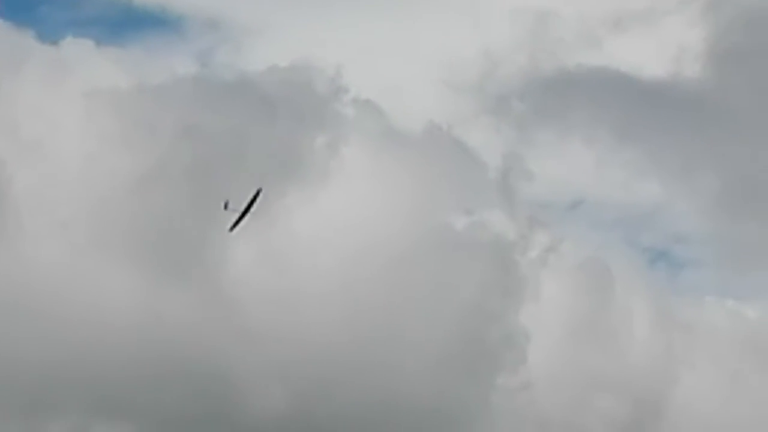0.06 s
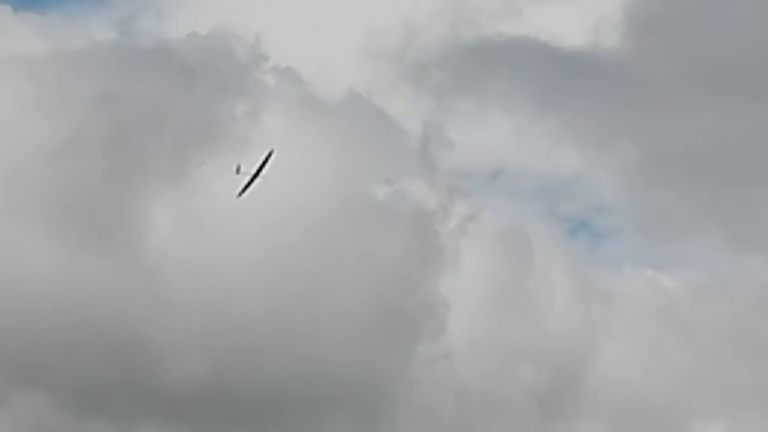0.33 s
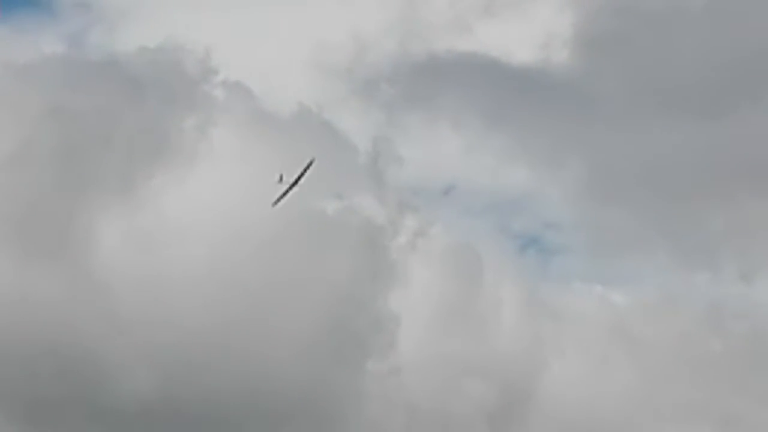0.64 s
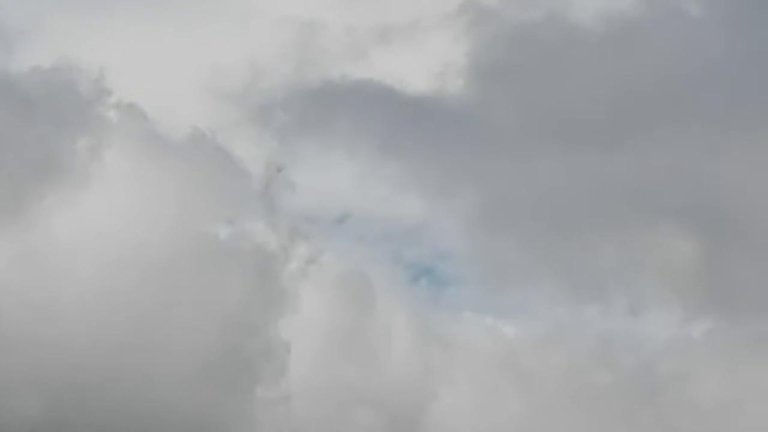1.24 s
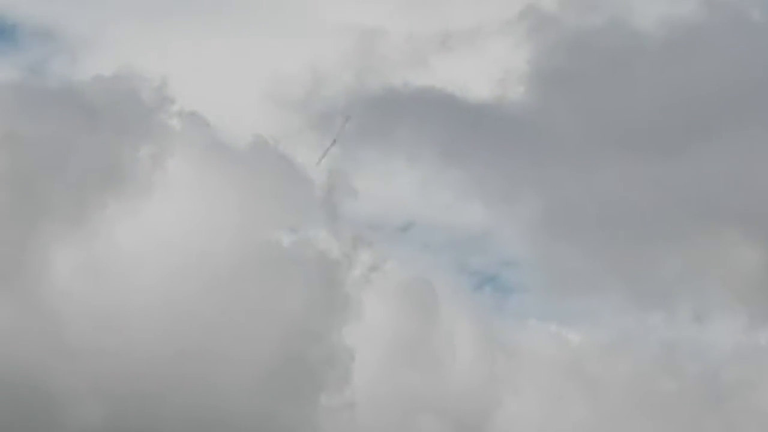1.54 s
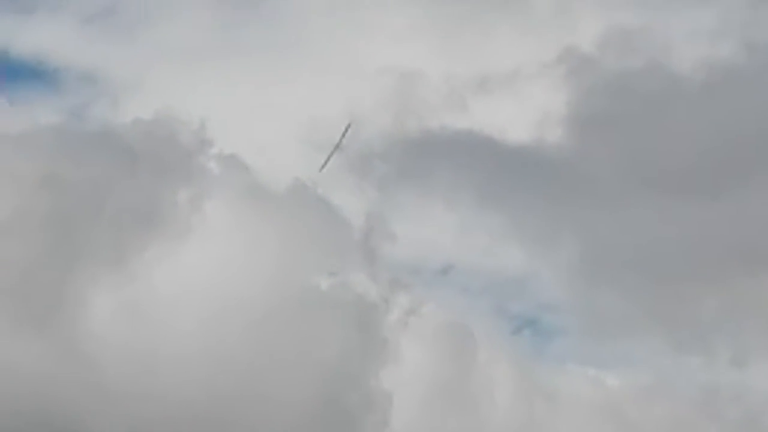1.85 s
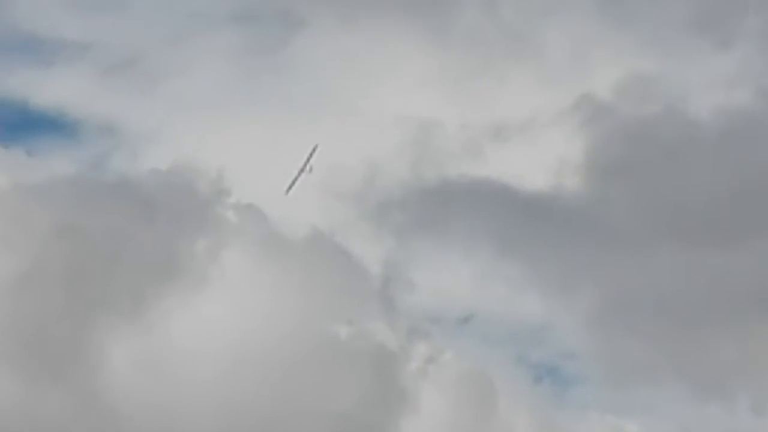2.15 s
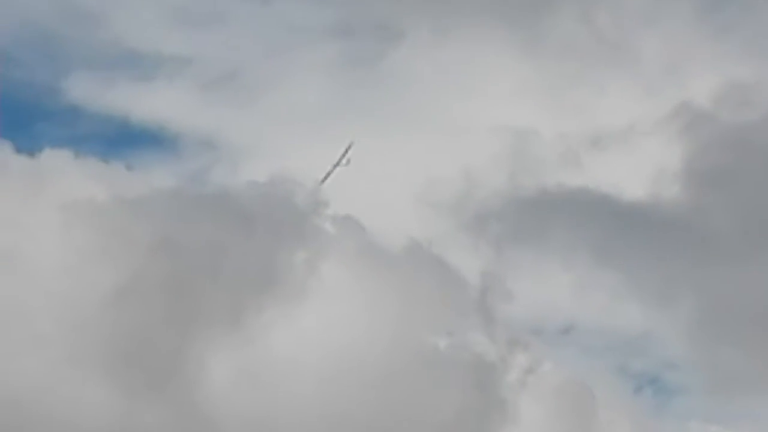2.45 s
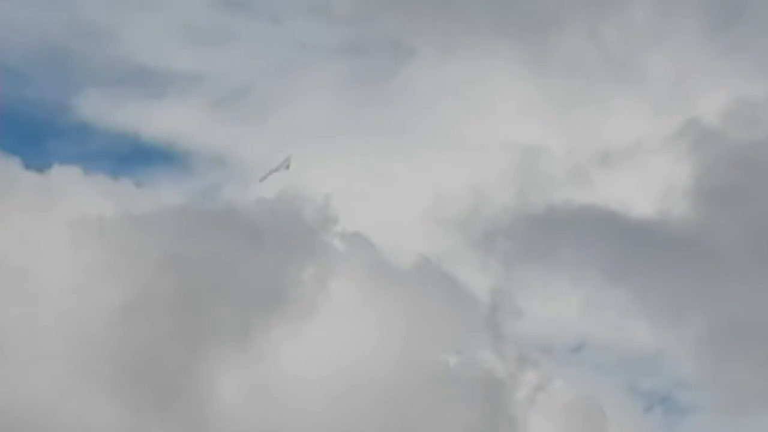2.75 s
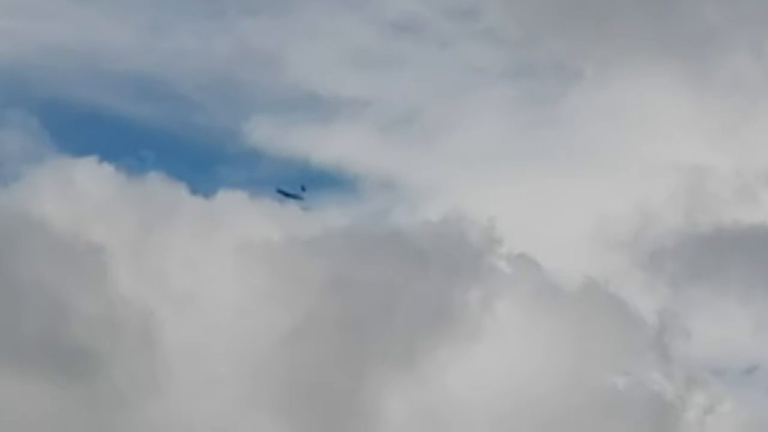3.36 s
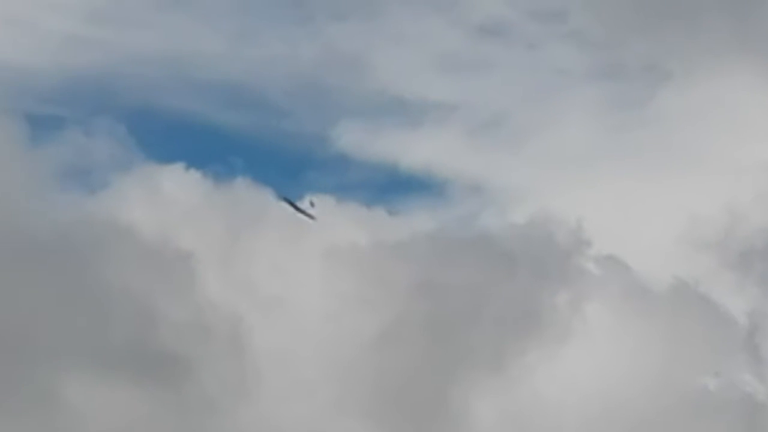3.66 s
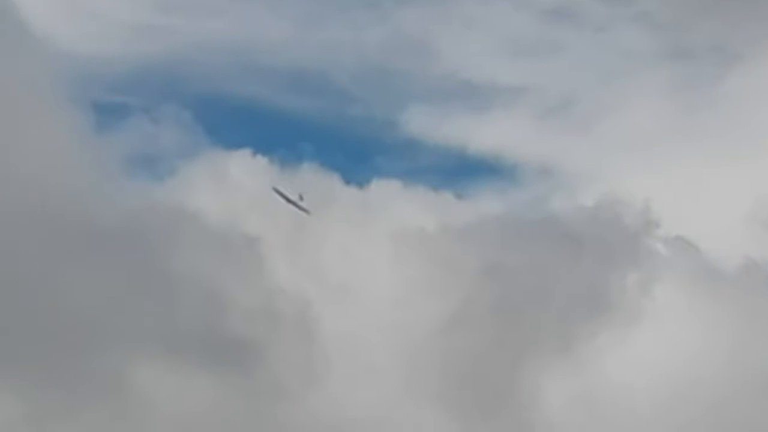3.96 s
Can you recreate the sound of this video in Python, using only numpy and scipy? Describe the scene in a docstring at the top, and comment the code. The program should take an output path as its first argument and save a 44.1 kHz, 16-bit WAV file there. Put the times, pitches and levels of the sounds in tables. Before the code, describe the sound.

Wind buffets the microphone outdoors while a model glider's faint airy whoosh fades away.

```python
"""Model glider in gusty wind

A model glider sweeps past with an airy whoosh off its wings, then banks away and fades.
Gusty wind rumbles on the microphone; its strongest eddies hit as thumps and sputtering buffets.
Behind it: a light grass rustle, a few faint ticks and a steady hiss."""
import sys
import numpy as np
from scipy import signal
from scipy.fft import rfft, irfft, next_fast_len
from scipy.io import wavfile
from scipy.ndimage import uniform_filter1d, map_coordinates

SR = 44100
rng = np.random.default_rng(int(sys.argv[2]) if len(sys.argv) > 2 else 0)


def file_out(sig):
    """Save sig as 16-bit WAV at sys.argv[1]."""
    # one column per channel
    cols = np.atleast_2d(sig).T
    # limit, then scale
    lim = np.clip(cols, -1, 1)
    pcm = np.round(lim * 32767).astype(np.int16)
    wavfile.write(sys.argv[1], SR, pcm)


N = 176400
TIME_S = np.arange(N) / SR

# glider pass: time_s, body_level_db, treble_over_body_db
GLIDER_PASS = [(0, -47, -2.5), (.07, -52.5, -9.5), (.2, -55, -12.5), (.29, -56.5, -3.5), (.38, -52, -6),
               (.49, -49.5, -7), (.58, -53, -6.5), (.66, -62.5, -2.5), (.72, -68, -3.5), (.85, -61, -1),
               (.93, -61.5, -5), (1.12, -65.5, 1), (1.3, -80, 5.5), (1.7, -81.5, -8.5), (4, -91, -11)]
# wing noise, body and treble: freq_hz, relative_db
WING_BODY_SPECTRUM = [(300, -10), (900, -4.5), (1450, 4.5), (2400, -1), (3700, 0.5), (4400, -5.5),
                      (5100, -14), (10000, -70)]
WING_TREBLE_SPECTRUM = [(2500, -21), (5200, -6.5), (6000, -2.5), (6800, -4), (7600, -7), (9000, -10.5),
                        (11400, -16.5), (12000, -25), (14300, -23.5)]
# wind strength: time_s, level_db
GUST_LEVELS = [(0, -19), (.1, -26), (.33, -22.5), (.41, -31), (.52, -35), (.69, -31), (.75, -19.5),
               (.9, -26), (1.04, -25), (1.26, -30), (1.31, -19.5), (1.45, -18.5), (1.57, -22),
               (1.64, -27.5), (1.89, -31.5), (1.97, -31), (2.0, -16), (2.07, -25.5), (2.25, -28),
               (2.295, -15.5), (2.34, -26.5), (2.5, -34.5), (2.6, -15.5), (2.67, -23.5), (2.85, -21),
               (3.25, -20), (3.39, -16), (3.45, -28.5), (3.63, -18.5), (3.69, -26), (3.92, -19.5), (4, -26)]
# wind noise, low to high: freq_hz, relative_db
RUMBLE_SPECTRUM = [(6, -26.5), (16, 7), (30, -1.5), (55, -4), (100, -7), (180, -14), (280, -25.5),
                   (420, -53.5), (1200, -110)]
FLUTTER_SPECTRUM = [(40, -23), (120, -5.5), (200, -0.5), (320, -8), (450, -20), (750, -41), (2000, -110)]
FLAP_SPECTRUM = [(200, -20), (350, -1), (480, 1), (620, -8), (800, -7.5), (1050, -19.5), (1500, -39.5),
                 (3000, -110)]
RASP_SPECTRUM = [(450, -27.5), (780, 3.5), (1000, 2), (1250, -2), (1600, -12), (2100, -33), (4000, -68.5)]
# large eddies: centre_s, relative_db, pitch_hz
THUMP_EVENTS = [(.255, -11.5, 39), (0.277, -23.5, 101), (0.333, -19.5, 233), (0.751, -14.5, 115),
                (1.092, -18.5, 138), (1.362, -15, 126), (1.44, -18, 69), (1.744, -22, 132),
                (1.994, -19.5, 130), (2.03, -15, 39.6), (2.294, -9.5, 72.3), (2.603, -4, 180),
                (2.845, -10.5, 29.6), (3.193, -17.5, 173), (3.352, -19.5, 130), (3.393, -11.5, 190)]
# sputtering buffets: centre_s, relative_db
BUFFET_EVENTS = [(0.333, -48.5), (0.751, -51), (1.192, -53), (1.291, -37), (1.349, -39.5), (1.364, -36),
                 (1.4, -28.5), (1.412, -32), (1.441, -32.5), (1.463, -25.5), (1.57, -38.5), (2.146, -50),
                 (2.297, -36), (2.603, -27.5), (2.617, -29), (2.674, -42), (2.723, -41), (2.749, -44),
                 (2.848, -34.5), (2.862, -25), (2.93, -43.5), (2.963, -23.5), (2.982, -43), (3.054, -36),
                 (3.072, -41.5), (3.128, -39), (3.153, -25.5), (3.196, -43), (3.246, -36), (3.348, -35.5),
                 (3.359, -43), (3.394, -42.5), (3.559, -47), (3.616, -40.5), (3.629, -35.5), (3.73, -47),
                 (3.757, -40), (3.814, -45), (3.858, -38), (3.947, -40)]
# grass rustle: time_s, level_db
RUSTLE_LEVELS = [(0, -90), (1.3, -70), (1.39, -56), (1.5, -62.5), (1.61, -73), (1.64, -58.5), (1.71, -75.5),
                 (1.85, -82.5), (2.02, -71), (2.08, -66), (2.17, -65), (2.3, -72.5), (2.6, -69.5),
                 (2.98, -61.5), (3.14, -66), (3.36, -72), (3.55, -75.5), (3.7, -66.5), (3.81, -80.5),
                 (4, -65.5)]
# brighter swishes: centre_s, level_db
SWISH_EVENTS = [(2.15, -71.5), (3.08, -74.5), (3.7, -77)]
# rustle, swish and steady hiss: freq_hz, relative_db
RUSTLE_SPECTRUM = [(400, -18), (1000, 7.5), (1600, 4), (2400, 0), (3600, 0), (5500, -8), (8000, -10.5),
                   (10000, -10.5), (12000, -23.5), (14300, -20.5)]
SWISH_SPECTRUM = [(4500, -17.5), (8000, 0), (12000, -16.5)]
HISS_SPECTRUM = [(1200, 7.5), (2500, -9), (5600, 4.5), (8000, -1.5), (14300, -3)]
# dry contacts: start_s, level_db, pitch_hz, t60_s, half_width_oct
TICK_EVENTS = [(0.248, -39, 3420, 0.024, 0.14), (.476, -35.5, 1760, 0.02, 0.27),
               (.858, -40.5, 1900, 0.013, 0.8), (1.378, -40.5, 3980, 0.0097, 0.71),
               (1.564, -57, 7200, .028, 0.15), (1.635, -60, 7800, .11, 0.18),
               (2.051, -51, 3450, 0.11, 0.19), (3.286, -41, 1900, 0.014, 0.33)]


def glider():
    """Turbulent air off the wings; level and brightness follow distance and bank."""
    level_db, treble_db = curves(GLIDER_PASS)
    body = drifting_comb(noise(WING_BODY_SPECTRUM))
    treble = shimmer(noise(WING_TREBLE_SPECTRUM)) * amp(treble_db)
    return amp(level_db) * (body + treble)


def wind(reference_db=-22):
    """Turbulence at the microphone; flutter and sputter grow faster with a gust than the rumble."""
    gust_db = uniform_filter1d(curves(GUST_LEVELS)[0], size=400) - reference_db
    churn = wobble(rate_hz=70)
    rumble = steadied(noise(RUMBLE_SPECTRUM), window_samples=2200) * amp(1 + gust_db)
    flutter = steadied(noise(FLUTTER_SPECTRUM), window_samples=1000)
    flutter *= amp(-19 + 1.45 * gust_db + 9.54 * churn)
    sputter = noise(FLAP_SPECTRUM) * amp(-47.5 + 3.2 * gust_db + 9.9 * churn + 7.5 * wobble(rate_hz=180))
    return amp(reference_db) * (rumble + flutter + sputter + eddies(gust_db))


def eddies(gust_db, rate_hz=38, pitch_hz=153.6, rise_oct_per_db=0.16, scatter_db=2.5):
    """Small eddies at irregular times; faster air makes them louder, shorter and higher."""
    out, t = np.zeros(N + SR), np.arange(-1300, 1300) / SR
    for k, (jitter, strength, detune, half_turns) in enumerate(rng.uniform(-1, 1, (400, 4))):
        i = int((k + 1 + jitter) / rate_hz * SR)
        if i < N:
            gain = amp(-3.5 + gust_db[i] + scatter_db * strength)
            hz = pitch_hz * 2 ** (rise_oct_per_db * gust_db[i]) * np.exp(.35 * detune)
            out[i:i + len(t)] += gain * pressure_swing(t * hz, half_turns, half_cycles=.45)
    return out[len(t) // 2:][:N]


def thumps(gain_db=4):
    """Each large eddy is one deep swing of pressure."""
    out = np.zeros(N)
    for centre_s, relative_db, pitch_hz in THUMP_EVENTS:
        cycles = np.clip((TIME_S - centre_s) * pitch_hz, -20, 20)
        half_turns = rng.uniform(-.93, 1)
        out += amp(gain_db + relative_db) * pressure_swing(cycles, half_turns, half_cycles=.42)
    return out


def buffets(hard_db=-25, half_length_s=.0031, wake_half_length_s=.018):
    """Air tears at the microphone opening: low puff, flap and, if hard, rasp, in a rough wake."""
    ragged = amp(12.6 * wobble(rate_hz=300))
    flap = steadied(noise(FLAP_SPECTRUM) * ragged, window_samples=200)
    rasp = steadied(noise(RASP_SPECTRUM) * ragged, window_samples=200)
    puff = steadied(noise(FLUTTER_SPECTRUM), window_samples=400)
    roughness = amp(-20.5) * unit(amp(9.5 * wobble(rate_hz=220)))
    out = np.zeros(N)
    for centre_s, relative_db in BUFFET_EVENTS:
        near = np.abs(TIME_S - centre_s) < .1
        t = TIME_S[near] - centre_s
        force_db = relative_db - hard_db
        width_s = half_length_s * np.exp(.0017 * force_db)
        wake = roughness[near] * amp(-force_db / 2) / np.cosh(t / wake_half_length_s) ** 2
        swell = 1 / np.cosh(t / width_s) ** 2 + wake
        out[near] += amp(2.5 + relative_db) * burst(flap[near], swell)
        out[near] += amp(-29.5 + 1.565 * force_db) * burst(rasp[near], swell)
        out[near] += amp(-22 + .21 * force_db) * burst(puff[near], 1 / np.cosh(t / width_s / 2))
    return out


def grass(swish_half_length_s=.041):
    """Light, grainy rustle that comes and goes, with a few brighter swishes."""
    level_db, = curves(RUSTLE_LEVELS)
    rustle = drifting_comb(noise(RUSTLE_SPECTRUM)) * amp(level_db + 1.1 * wobble(rate_hz=170))
    swish_gain = sum(amp(db) / np.cosh((TIME_S - s) / swish_half_length_s) for s, db in SWISH_EVENTS)
    return rustle + swish_gain * noise(SWISH_SPECTRUM)


def ticks(rise_s=.0011):
    """Small dry contacts near the microphone, each a short ring of band noise."""
    out, t = np.zeros(N + SR), np.arange(SR // 8) / SR
    freq_hz = np.fft.rfftfreq(len(t), 1 / SR) + 1
    for start_s, level_db, pitch_hz, t60_s, half_width_oct in TICK_EVENTS:
        band = 1 / (1 + (np.log2(freq_hz / pitch_hz) / half_width_oct) ** 2)
        ring = unit(irfft(rfft(rng.standard_normal(len(t))) * band, len(t)))
        envelope = amp(level_db - 60 * t / t60_s) * (1 - np.exp(-t / rise_s))
        out[round(start_s * SR):][:len(t)] += ring * envelope
    return out[:N]


def hiss(level_db=-75):
    """Faint, steady background."""
    return amp(level_db) * noise(HISS_SPECTRUM)


def pressure_swing(cycles, half_turns, half_cycles):
    """Pulse of an eddy crossing the microphone; half_turns is its phase, half_cycles its half length."""
    return np.cos(2 * np.pi * cycles + np.pi * half_turns) / np.cosh(cycles / half_cycles)


def drifting_comb(x, delay_s=.0009, drift=.12, copy_gain=.3):
    """A weak copy with drifting delay shifts the colour of a hiss."""
    delay_samples = delay_s * SR * (1 + drift * wobble(rate_hz=2.6))
    return unit(x + copy_gain * map_coordinates(x, [np.arange(N) - delay_samples]))


def shimmer(x, depth_db=2.5, span_bins=5, span_frames=18):
    """Narrow bands swell and fade independently."""
    bands = signal.stft(x, nperseg=512)[2]
    swells = uniform_filter1d(rng.standard_normal(bands.shape), size=span_bins, axis=0)
    swells = unit(uniform_filter1d(swells, size=span_frames, axis=1))
    return unit(signal.istft(bands * amp(depth_db * swells), nperseg=512)[1][:N])


def noise(spectrum):
    """Coloured noise, rms 1."""
    freq_hz, relative_db = np.transpose(spectrum)
    size = next_fast_len(N + SR // 2)
    bin_hz = np.fft.rfftfreq(size, 1 / SR)
    response = amp(np.interp(np.log(bin_hz + 1), np.log(freq_hz), relative_db))
    return unit(irfft(rfft(rng.standard_normal(N), size) * response, size)[:N])


def steadied(x, window_samples):
    """Even out swells longer than the window."""
    power = uniform_filter1d(uniform_filter1d(x ** 2, window_samples), window_samples)
    return x / np.sqrt(np.abs(power) + 1e-9)


def burst(x, envelope):
    """Enveloped noise with the rms of the envelope."""
    return unit(x * envelope) * np.sqrt(np.mean(envelope ** 2))


def wobble(rate_hz):
    """Smooth random curve with softened extremes."""
    knots = 2 * np.tanh(rng.standard_normal(4096) / 2)
    return map_coordinates(knots, [TIME_S * rate_hz], mode="wrap")


def curves(rows):
    """Per-sample values of each column after time_s."""
    time_s, *columns = np.transpose(rows)
    return [np.interp(TIME_S, time_s, column) for column in columns]


def amp(db):
    """Decibels to gain."""
    return 10 ** (np.asarray(db) / 20)


def unit(x):
    """Scale to rms 1."""
    return x / np.sqrt(np.mean(x ** 2) + 1e-20)


def scene():
    """All sources, mono."""
    return (glider() + wind() + thumps() + buffets() + grass() + ticks() + hiss())[None]


def record(dry):
    """Soft microphone overload, short end fades, steep low-pass."""
    ceiling, fade_s, cutoff_hz = .97, .012, 14360
    rounded = dry / np.sqrt(np.hypot(1, (dry / ceiling) ** 2))
    edge_s = np.minimum(TIME_S, TIME_S[-1] - TIME_S)
    fade = np.sin(np.pi / 2 * np.clip(edge_s / fade_s, 0, 1)) ** 2
    lowpass = signal.ellip(12, .1, 80, cutoff_hz, fs=SR, output="sos")
    return signal.sosfilt(lowpass, rounded * fade)


dry = scene()
out = record(dry)
file_out(out)
```